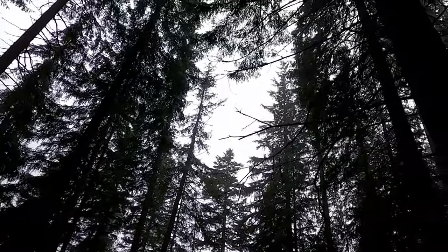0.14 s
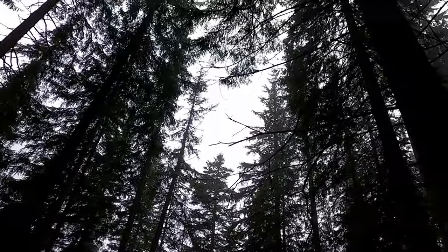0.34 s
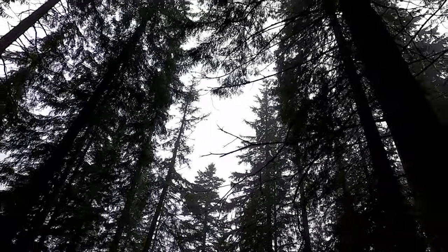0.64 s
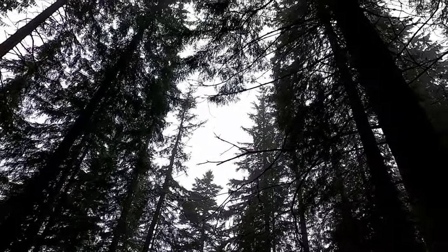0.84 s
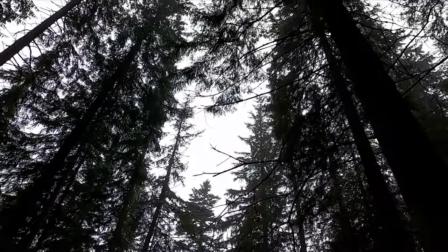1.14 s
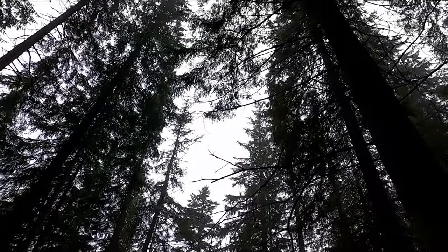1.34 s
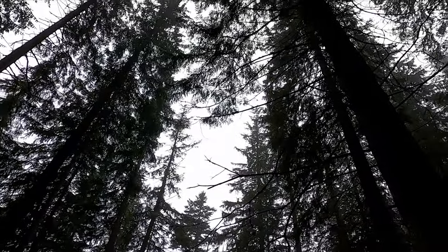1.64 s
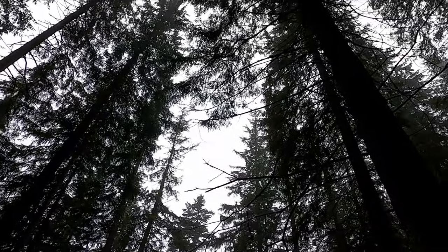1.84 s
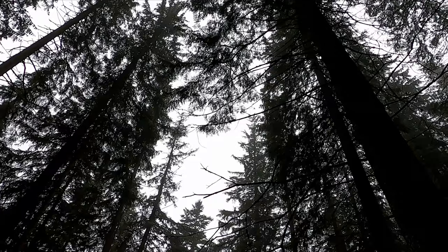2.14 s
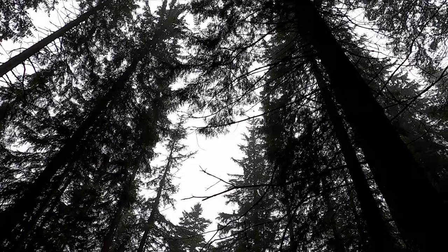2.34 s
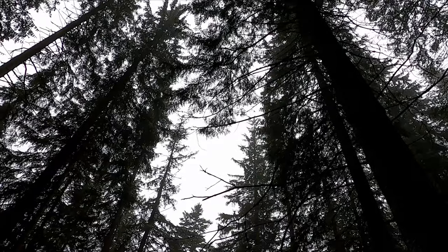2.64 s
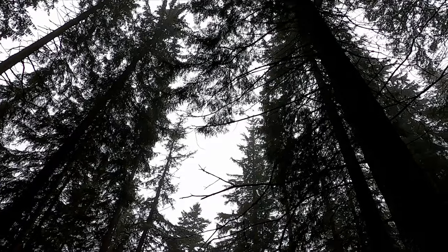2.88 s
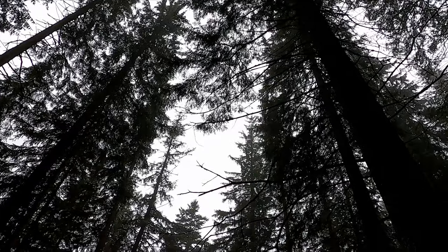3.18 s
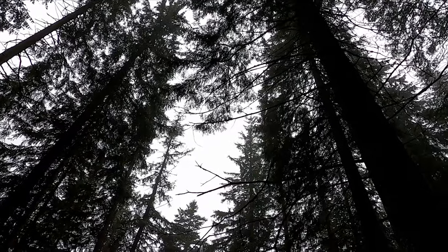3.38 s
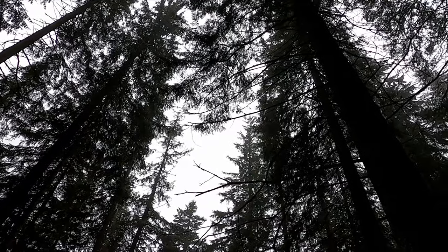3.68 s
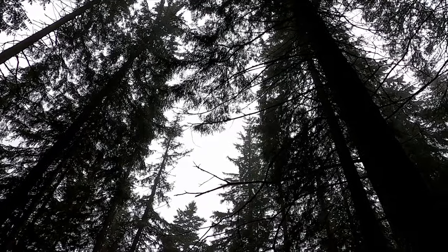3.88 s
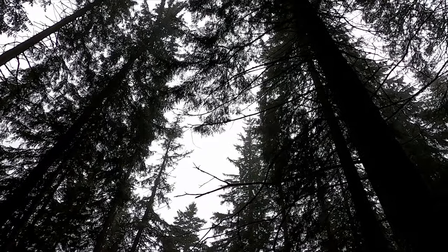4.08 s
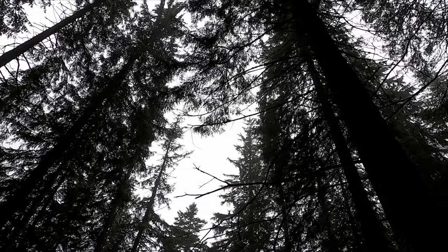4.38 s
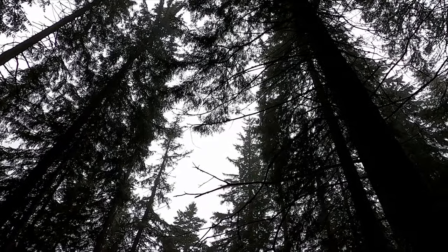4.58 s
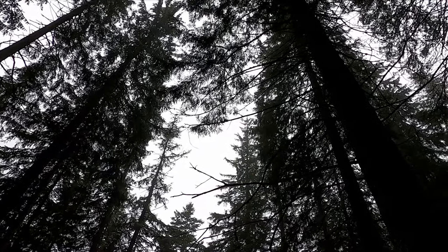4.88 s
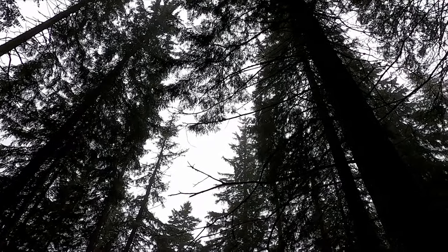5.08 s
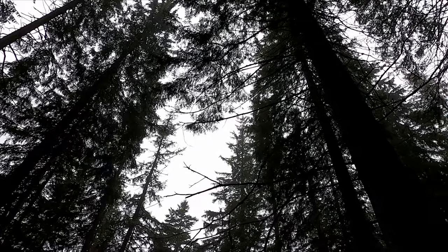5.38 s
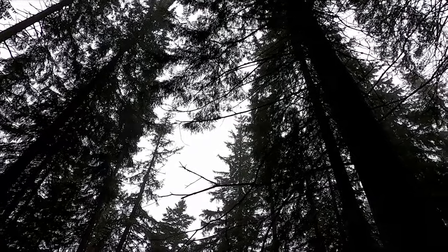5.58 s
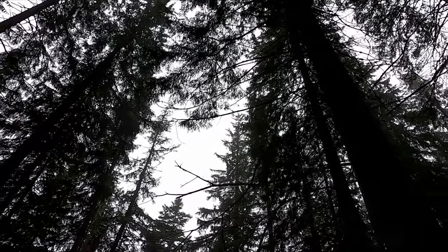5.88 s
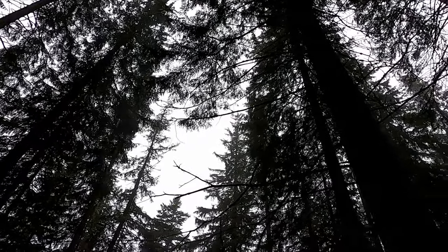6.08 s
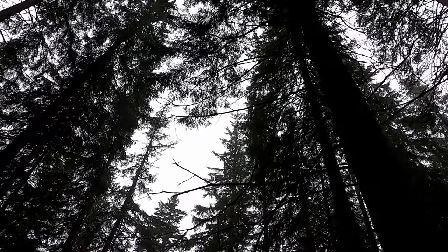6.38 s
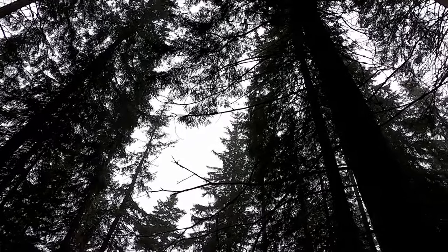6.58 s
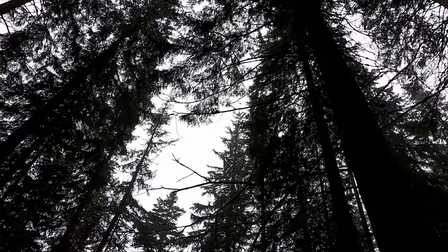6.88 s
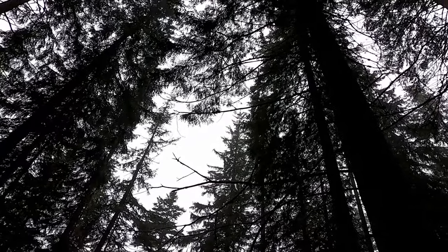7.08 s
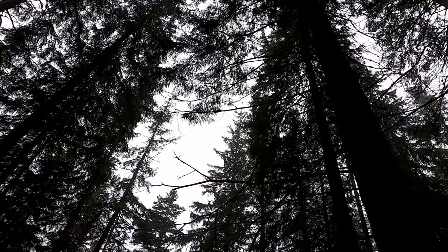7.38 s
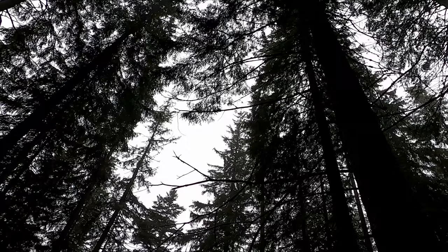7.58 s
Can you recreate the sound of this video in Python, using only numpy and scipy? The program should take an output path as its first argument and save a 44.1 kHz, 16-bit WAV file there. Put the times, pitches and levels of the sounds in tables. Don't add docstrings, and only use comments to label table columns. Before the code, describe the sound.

A hushed wet conifer forest opens with a small clack and soft finger knocks on a hand-held camera, then faint wind and sparse ticks of drips. From about three seconds a flock of small birds swells overhead, hundreds of thin gliding whistles blurring into a high hiss, nearer calls standing out with short woodland tails. Wind rises gently; a few dull knocks and one sharp drop hit the camera body.

```python
import sys
import numpy as np
from scipy import signal
from scipy.fft import rfft, irfft
from scipy.io import wavfile
from scipy.ndimage import uniform_filter1d

SR = 44100
rng = np.random.default_rng(int(sys.argv[2]) if len(sys.argv) > 2 else 0)


def decibels_to_gain(level_db):
    exponent = np.asarray(level_db, float) / 20
    return 10 ** exponent


def inscribe(sig):
    pcm = np.round(np.clip(np.atleast_2d(sig).T, -1, 1) * 32767)
    wavfile.write(sys.argv[1], SR, pcm.astype(np.int16))


N = 340893

# time_s, level_db
GUST = [(0.0, -62), (0.26, -59.5), (0.47, -63.5), (0.86, -64), (1.14, -60), (1.46, -63.5), (2.24, -62),
        (2.7, -59), (3.25, -55.5), (4.11, -52.5), (4.52, -54), (5.02, -53), (5.4, -50.5), (5.7, -50),
        (6.0, -50.5), (6.42, -52.5), (7.0, -53), (7.73, -52.5)]
# freq_hz, density_db
SIGH_COLOUR = [(90, -42), (125, -19.5), (160, -3.5), (250, -4), (600, -4), (1030, -0.5), (1370, 0),
               (2000, -5), (3000, -11), (5000, -27), (7000, -43), (9000, -52), (12000, -60)]
# freq_hz, density_db
NEEDLE_COLOUR = [(800, -30), (2000, 0), (4000, -1), (7000, -9), (8000, -13), (9000, -17), (10000, -18),
                 (11500, -25), (12500, -29), (13500, -34), (15000, -43), (17000, -80)]
CALM_DB, STIR_DB = -60.5, -52.5
NEEDLE_DB, NEEDLE_SLOPE, SHAKE_SLOPE = -73.5, 1.8, 1.9

# start_s, peak_db, ring_hz, width_hz
DRIP = [
    (0.052, -52, 6000, 4000),
    (0.175, -55, 2350, 300),
    (1.6776, -50, 5800, 4500),
    (1.922, -48.5, 5800, 3500),
    (2.558, -44.5, 5200, 5000),
    (3.0245, -48.5, 6700, 2500),
    (3.3094, -58, 9500, 4000),
    (6.846, -55, 1200, 300),
]
SPLAT_S = 7.3921
SPLAT = [
    (-46, 249, 74),
    (-25, 2800, 700),
    (-25, 3330, 900),
    (-42, 3600, 3300),
    (-35.5, 7950, 1300),
]

# time_s, rumble_db
GRIP = [(0.02, -64), (0.1, -72), (0.17, -57), (0.32, -72), (0.49, -61.5), (0.6, -76), (0.71, -69),
        (0.9, -73), (1.05, -74), (1.25, -89), (1.38, -90), (1.5, -91), (1.62, -93), (1.8, -67), (1.89, -69),
        (2.11, -90), (3.75, -84), (4.3, -87), (4.42, -80), (4.54, -83)]
GRIP_RISE_DB_S, GRIP_FALL_DB_S, HELD_DB, HELD_SLOPE = 230, 181, -99, 0.51
# start_s, length_s, centre_hz, width_hz,
# level_db
RUB = [(.13, 0.23, 2700, 780, -67), (0.11, 0.088, 6500, 3500, -74), (.36, .08, 5500, 3500, -73),
       (0.37, 0.11, 2300, 1200, -69), (.12, 0.19, 580, 600, -56), (.88, .18, 4500, 5000, -74),
       (6.86, .1, 7800, 1500, -65), (2.545, 0.32, 4350, 1500, -60), (2.555, .2, 4400, 1700, -61),
       (1.4, .16, 4400, 1400, -71), (2.552, .08, 4600, 2200, -63), (2.76, .12, 4400, 2000, -64),
       (7.39, .1, 9000, 5000, -76), (2.84, 0.11, 2900, 900, -57), (1.3, .14, 5600, 2400, -73)]
# start_s, peak_db, ring_hz,
# width_hz
PAT = [(1.0457, -46, 363, 300), (1.046, -60, 1390, 100), (1.046, -55, 1050, 120), (1.787, -47.5, 1384, 130),
       (1.787, -51, 1010, 100), (1.7765, -55, 620, 260), (1.7867, -38, 395, 350), (1.787, -52, 1580, 630),
       (5.509, -39.5, 313, 210), (5.622, -34, 410, 370), (5.811, -39.5, 287, 122), (7.3905, -42, 900, 600),
       (7.3925, -44, 500, 300), (7.401, -46, 450, 200)]
CLACK_S = .1195
CLACK = [
    (-28, 920, 330),
    (-45, 1680, 410),
    (-57, 3600, 500),
    (-56, 6700, 1500),
]
# start_s, thud_hz, thud_db, low_shell_db, high_shell_db
KNOCK = [(.053, 266, -58, -68, -67), (.111, 345, -69, -50, -64), (.118, 494, -42.5, -39, -40),
         (.163, 477, -53, -66, -62.5), (.174, 466, -56, -69, -66), (.216, 400, -53, -50.5, -64),
         (.24, 560, -65, -59, -69), (.253, 523, -55, -62, -79), (.264, 533, -58, -64, -75),
         (.289, 428, -59, -71, -69), (.359, 446, -52.5, -77, -64.5), (1.0448, 563, -52, -45, -57),
         (1.7856, 540, -54, -37.5, -43), (2.468, 202, -55.5, -62, -69.5), (5.507, 264, -59, -57, -65),
         (5.566, 780, -42.5, -44, -41.5), (5.621, 573, -49, -54, -58), (5.631, 800, -48, -49.5, -58),
         (5.814, 297, -46.5, -55, -55), (5.99, 250, -51.5, -66, -66.5), (7.391, 400, -39.5, -58, -54)]
# freq_hz, t60_s
SHELL = [
    (646, 0.071),
    (1270, 0.047),
]

# start_s, length_s, middle_hz, sweep_hz, level_db
ARCHED = [(.195, 0.097, 3950, -850, -72), (.525, 0.064, 3170, -250, -71), (.708, .03, 4580, 900, -69),
          (.73, 0.14, 4570, -750, -72), (1.215, .1, 3960, 60, -77), (1.4, .14, 4350, -850, -70),
          (1.67, .041, 3250, 170, -67), (1.946, .13, 3910, 210, -61.5), (2.02, .1, 4630, -900, -71),
          (2.315, .05, 3950, -60, -68), (2.366, 0.1, 4080, -70, -66.5), (2.377, 0.074, 3360, -700, -65),
          (2.41, .04, 4750, -150, -67), (2.455, .06, 4550, -450, -68), (3.114, .058, 4760, -190, -55),
          (3.47, 0.081, 3590, 400, -50.5), (4.15, .06, 5000, 100, -55), (6.21, 0.056, 3590, 0, -46),
          (3.475, .055, 6500, 800, -67), (3.489, 0.07, 3100, 320, -48.5), (3.49, 0.062, 6340, -650, -67),
          (3.54, .06, 5600, 100, -60), (3.86, .13, 3850, -280, -46.5), (4.764, .042, 4840, 120, -60),
          (4.96, 0.061, 4660, 670, -50), (6.869, 0.11, 3290, 388, -52), (7.126, 0.07, 4430, 350, -45)]
# start_s, length_s, middle_hz, sweep_hz, level_db
SAGGING = [(0.0, 0.12, 4360, -540, -70.5), (2.565, 0.07, 4440, -150, -64), (2.6, .05, 4140, -200, -64),
           (2.645, .075, 3950, 500, -63), (2.87, .07, 2900, 500, -64), (3.07, 0.13, 3800, -500, -47.5),
           (3.11, .09, 3870, -450, -50), (3.19, 0.059, 3580, -50, -55.5), (3.2, 0.13, 4510, -270, -55),
           (3.535, .08, 3760, -480, -48), (4.734, .095, 3704, -230, -42), (4.54, .035, 3380, -300, -51),
           (3.799, 0.069, 4770, 94, -54), (4.02, 0.052, 5300, -50, -55), (4.322, .075, 5550, 20, -64),
           (4.952, 0.067, 3370, 362, -49), (5.23, .1, 3700, -400, -46.5), (5.24, 0.11, 3800, -300, -48),
           (5.74, 0.12, 3825, -300, -50.5), (5.1, 0.051, 3610, 50, -45.5), (5.13, 0.084, 4160, 50, -51),
           (7.012, .044, 2990, 300, -57), (6.415, 0.05, 3770, 400, -44.5), (6.515, 0.05, 3650, 450, -41.5),
           (5.85, .055, 4130, -650, -48), (7.54, 0.058, 3480, 302, -47), (5.35, .04, 3560, 100, -49),
           (6.97, .04, 4300, -500, -48), (7.01, .04, 3660, 200, -48), (7.62, .07, 3720, -150, -47),
           (6.58, .08, 4260, 500, -50), (5.83, .03, 4720, 0, -49), (5.8, .05, 3690, -100, -49),
           (1.46, .05, 4220, -300, -72), (.81, .05, 4120, -200, -74)]
# start_s, length_s, middle_hz, sweep_hz, level_db
STRAIGHT = [(.94, 0.05, 4200, -150, -78), (1.03, 0.037, 4090, 300, -73), (1.37, 0.044, 5270, -500, -72),
            (1.903, 0.063, 4220, -380, -77), (2.096, 0.042, 3340, 4, -67.5),
            (2.635, 0.11, 4720, -250, -58.5), (2.74, .05, 4650, -100, -63), (2.76, .04, 5000, -150, -67),
            (2.735, 0.05, 3800, -200, -63), (2.92, .08, 3150, 50, -59), (2.911, 0.12, 6300, 300, -71),
            (2.916, 0.14, 3310, -200, -58), (3.01, 0.16, 3590, -170, -52.5), (3.39, 0.04, 2850, 0, -59),
            (3.974, 0.08, 2860, 153, -55.5), (4.066, 0.12, 3730, 220, -56), (4.21, .051, 3140, -270, -50),
            (4.322, 0.049, 4530, 115, -48), (3.57, .035, 5150, 10, -56.5), (3.61, 0.075, 3800, -55, -48),
            (3.68, .11, 3690, -250, -41), (4.185, .04, 4380, -700, -54), (4.44, 0.047, 3800, 250, -50),
            (4.49, 0.05, 4900, -800, -57), (4.58, 0.11, 3500, 12, -61), (5.05, .04, 3940, 100, -51),
            (5.95, 0.031, 3950, 300, -44.5), (6.12, 0.05, 4300, 450, -47), (6.14, .06, 3330, 450, -45),
            (5.035, .035, 5480, -270, -56), (5.575, .096, 3860, -510, -44), (5.816, .055, 4700, 52, -62),
            (5.996, 0.065, 4740, -200, -50), (6.087, 0.085, 3670, -57, -45),
            (6.223, 0.072, 4660, -100, -53), (6.471, 0.089, 3550, -48, -47), (7.156, 0.071, 3730, -2, -46),
            (5.27, .07, 3850, -200, -46), (5.28, .05, 3620, -200, -45), (6.93, .08, 3400, 0, -49)]
# start_s, length_s, middle_hz, sweep_hz, level_db
SEEP = [
    (2.916, .052, 6740, -60, -76),
    (3.47, .07, 6700, 20, -76),
    (3.948, .032, 6700, 0, -64),
    (4.54, 0.049, 8800, 993, -76),
    (4.646, .086, 8710, 198, -75),
    (4.768, .063, 8300, 117, -72),
    (5.39, 0.04, 9120, -100, -69),
    (6.257, 0.05, 8800, -640, -73),
    (6.915, 0.035, 7040, -1300, -64),
    (7.23, .06, 7100, -130, -68),
]
ARCH, SAG = 0.0402, 0.0285
CROWD_DB = -57
FOREST_T60_S, FOREST_DB = 0.44, -8.5

# time_s, level_db
FLOCK = [(0.0, -66.5), (0.45, -76.5), (1.95, -65), (2.17, -68.5), (2.52, -63), (2.62, -65), (2.88, -57),
         (3.18, -53.5), (3.4, -46.5), (3.85, -43), (4.8, -42), (5.62, -41), (6.11, -40.5), (6.33, -42),
         (6.5, -41), (7.17, -39.5), (7.32, -39.5), (7.73, -39)]
# freq_hz, density_db
FLOCK_COLOUR = [(1500, -18), (2000, -18.5), (2670, -9.5), (3200, -3.5), (3670, 0), (4520, -2.5), (5000, -8),
                (6000, -16), (7000, -27.5), (8000, -35), (10000, -57)]

EDGE_HZ, EDGE_DB, EDGE_HZ_PER_DB, EDGE_JITTER_HZ = 12800, -90, 175, 260


def coloured(points, x=None):
    x = rng.standard_normal(N) if x is None else x
    hz, db = np.transpose(points)
    f = np.maximum(np.arange(N // 2 + 1) * SR / N, 1)
    gain = decibels_to_gain(np.interp(np.log(f), np.log(hz), db, left=-90, right=-90))
    y = irfft(rfft(x) * gain, N)
    return y / np.sqrt(np.mean(y ** 2))


def curve(table, column):
    rows = np.transpose(table)
    return np.interp(np.arange(N) / SR, rows[0], rows[column])


def walk(rate_hz):
    k = int(SR / rate_hz)
    steps = np.repeat(rng.standard_normal(N // k + 1), k)
    return 1.164 * uniform_filter1d(uniform_filter1d(steps, k), k)[:N]


def flickering(x, swell_db, flicker_db, rate_hz):
    spectrum = rfft(x)
    half_octave = 2 * np.log2(np.maximum(np.arange(N // 2 + 1) * SR / N, 1))
    out, swell = 0, walk(1.104)
    for k in range(12, 29):
        band = irfft(spectrum * np.clip(1 - np.abs(half_octave - k), 0, 1), N)
        out = out + band * decibels_to_gain(swell_db * swell + flicker_db * walk(rate_hz))
    return out


def add(out, start_s, x):
    i = int(max(start_s, 0) * SR)
    out[i:i + len(x)] += x[:max(N - i, 0)]


def high_pass(x, order, hz):
    return signal.sosfilt(signal.butter(order, hz, "high", fs=SR, output="sos"), x)


def capsule():
    return decibels_to_gain(-92) * coloured([(5000, -35), (8000, -3), (11500, -1.0), (13000, -6), (15000, -29)])


def wind():
    gust_db = curve(GUST, 1)
    sigh = flickering(coloured(SIGH_COLOUR), swell_db=.7, flicker_db=1.1, rate_hz=9)
    needles = flickering(coloured(NEEDLE_COLOUR), swell_db=.5, flicker_db=1.4, rate_hz=10)
    hiss_db = NEEDLE_DB + NEEDLE_SLOPE * np.maximum(gust_db - CALM_DB, 0)
    hiss_db = hiss_db + SHAKE_SLOPE * np.maximum(gust_db - STIR_DB, 0)
    return sigh * decibels_to_gain(gust_db + 1.0) + needles * decibels_to_gain(hiss_db)


def short_rings(rows):
    out, t = np.zeros(N), np.arange(SR // 30) / SR
    for start_s, peak_db, hz, width_hz in rows:
        ring = np.sin(2 * np.pi * hz * t) * (1 - np.exp(-hz * t / 0.55))
        ring = ring * np.exp(-np.pi * width_hz * t / 2)
        if hz > 2500:
            ring = high_pass(ring, 3, 2000)
        add(out, start_s + 0.00064, decibels_to_gain(peak_db + 12.0) * ring)
    return signal.sosfilt(signal.butter(3, 11000, fs=SR, output="sos"), out)


def drips():
    return short_rings(DRIP + [(SPLAT_S, *ring) for ring in SPLAT])


def grip():
    t = np.arange(N) / SR
    db = HELD_DB + HELD_SLOPE * (curve(GUST, 1) - CALM_DB)
    for peak_s, peak_db in GRIP:
        drop_db = np.maximum(GRIP_RISE_DB_S * (peak_s - t), GRIP_FALL_DB_S * (t - peak_s))
        db = np.maximum(db, peak_db - drop_db)
    rumble = coloured([(15, -3), (30, -2.5), (60, -7.0), (100, -7.5), (135, -4), (170, -27)])
    return rumble * decibels_to_gain(db + 6.3 * walk(18))


def rubs():
    out = np.zeros(N)
    for start_s, length_s, hz, width_hz, db in RUB:
        band = signal.butter(3, [hz - width_hz / 2, hz + width_hz / 2], "band", fs=SR, output="sos")
        noise = signal.sosfilt(band, rng.standard_normal(SR // 2))[:int(length_s * SR)]
        grain = decibels_to_gain(3 * walk(70)[:len(noise)])
        swish = noise / np.std(noise) * grain * np.sqrt(np.hanning(len(noise)))
        add(out, start_s, decibels_to_gain(db) * swish)
    return out


def pats_and_clack():
    return short_rings(PAT + [(CLACK_S, *ring) for ring in CLACK])


def knocks():
    out, t = np.zeros(N), np.arange(SR // 10) / SR
    mute = decibels_to_gain(-13 * np.clip((t - .016) / 0.0061, 0, 1))
    rise = (1 - np.exp(-t / 0.0013)) * mute
    for start_s, thud_hz, *levels_db in KNOCK:
        modes = [(thud_hz, .03)] + SHELL
        for (hz, t60_s), db, chance in zip(modes, levels_db, rng.standard_normal(3)):
            fade = np.exp(-np.log(1000) * t / t60_s) + 1.25 * np.exp(-t / 0.0021)
            ring = np.sin(2 * np.pi * hz * (1 + 0.02 * chance) * t) * fade
            add(out, start_s + 0.00145, -decibels_to_gain(db + 9.0) * rise * ring)
    return out


def forest(x, count=8):
    t = np.arange(SR // 2) / SR
    fade = np.exp(-np.log(1000) * t / FOREST_T60_S) * np.clip(t / 0.0067, 0, 1)
    turn = np.arange(N) / SR / .05 % count
    out = 0
    for k in range(count):
        gate = np.clip(1 - np.abs((turn - k + count / 2) % count - count / 2), 0, 1)
        out = out + signal.oaconvolve(x * np.sqrt(gate), rng.standard_normal(len(t)) * fade)[:N]
    return out / np.sqrt(np.sum(fade ** 2))


def whistles(rows, waver, edge):
    out, drift = np.zeros(N), walk(90)
    breath = decibels_to_gain(np.clip(3 * walk(80), -8, 3))
    for k, (start_s, length_s, start_hz, mid_hz, end_hz, db) in enumerate(rows):
        u = np.linspace(-1, 1, int(length_s * SR))
        bend_hz = (start_hz + end_hz) / 2 - mid_hz
        hz = mid_hz + u * (end_hz - start_hz) / 2 + u ** 2 * bend_hz
        i = k * 7919 % (N - SR)
        hz = hz * (1 + waver * drift[i:i + len(u)])
        shape = np.clip((1 - np.abs(u)) / edge, 0, 1) * breath[i:i + len(u)]
        tone = np.sin(2 * np.pi * np.cumsum(hz) / SR)
        add(out, start_s, np.sqrt(2) * decibels_to_gain(db) * shape * tone)
    return out


def songs():
    rows = []
    for kind, bend in ((ARCHED, -ARCH), (SAGGING, SAG), (STRAIGHT + SEEP, 0)):
        for start_s, length_s, hz, sweep_hz, db in kind:
            ends_hz = hz * (1 + bend)
            rows.append((start_s, length_s, ends_hz - sweep_hz / 2, hz, ends_hz + sweep_hz / 2, db))
    return np.array(rows)


def near_birds():
    calls = songs()
    near = whistles(calls, waver=.008, edge=.22)
    crowd = calls[calls[:, 5] > CROWD_DB]
    higher = crowd * [1, .8, 1.06, 1.03, 1.0, 1] + [0.035, 0, 0, 0, 0, -8]
    lower = crowd * [1, .9, 0.93, .97, 1.01, 1] + [-0.025, 0, 0, 0, 0, -10]
    above = whistles(higher, waver=.012, edge=0.37)
    below = whistles(lower, waver=0.012, edge=0.34)
    birds = decibels_to_gain(1) * near + above + below
    return birds + decibels_to_gain(FOREST_DB) * forest(birds)


def flock(count=2600):
    when, pitch, size = rng.random((count, 3)).T
    turn = np.arange(count)
    start_s = (turn + when) / count * N / SR
    pitch = (turn * (np.sqrt(5) - 1) / 2 + .1 * pitch) % 1
    length, fall, bend = rng.standard_normal((count, 3)).T
    length_s = .042 * decibels_to_gain(2 * np.clip(length, -2, 1.5))
    hz = 2000 + 5500 * pitch
    fall = 0.04046 + .1 * fall
    rows = np.transpose([start_s, length_s, hz * (1 + fall), hz * (1 + .05 * bend),
                         hz * (1 - fall), 4 * size])
    calls = whistles(rows, waver=0.012, edge=0.5)
    blur = np.std(calls) * decibels_to_gain(6) * rng.standard_normal(N)
    heard = calls + decibels_to_gain(-1) * forest(calls) + blur
    heard = flickering(heard, swell_db=.5, flicker_db=1.2, rate_hz=6)
    return coloured(FLOCK_COLOUR, heard) * decibels_to_gain(curve(FLOCK, 1) - 0.5)


def scene():
    taps = high_pass(drips() + pats_and_clack() + knocks(), 4, 150)
    mix = capsule() + wind() + taps + grip() + rubs() + near_birds() + flock()
    return mix[None]


def treble_limit(x):
    hz, _, z = signal.stft(x, SR, nperseg=2048)
    hiss = np.sum(np.abs(z[(hz > 11300) & (hz < 12600)]) ** 2, axis=0)
    hiss_db = 10 * np.log10(signal.medfilt(hiss, 7) + 1e-18)
    edge_hz = EDGE_HZ + EDGE_HZ_PER_DB * np.clip(hiss_db - EDGE_DB, 0, 9)
    ragged = uniform_filter1d(rng.standard_normal((65, z.shape[1])), size=2)
    ragged = np.repeat(ragged, 16, axis=0)[:len(hz)]
    reach_hz = EDGE_JITTER_HZ * (1 + (edge_hz - EDGE_HZ) / 900)
    band_hz = (hz // 345 * 345)[:, None]
    kept = z * (band_hz < edge_hz - 170 + reach_hz * ragged)
    return signal.istft(kept, SR, nperseg=2048)[1][:N]


def roll_off(x):
    return signal.sosfilt(signal.butter(12, 15500, fs=SR, output="sos"), x)


def record(dry):
    mix = treble_limit(dry[0])[None]
    return roll_off(mix)


dry = scene()
out = record(dry)
inscribe(out)
```